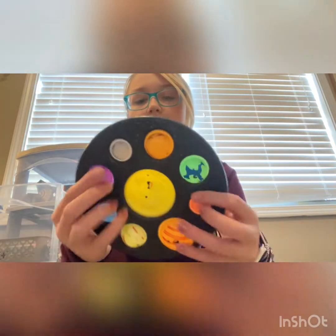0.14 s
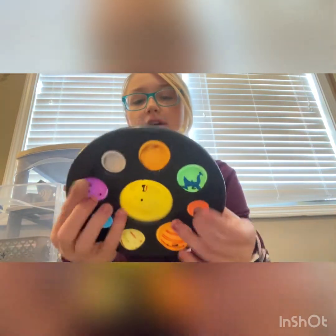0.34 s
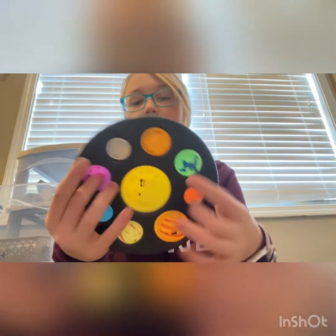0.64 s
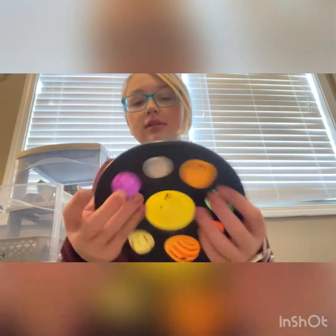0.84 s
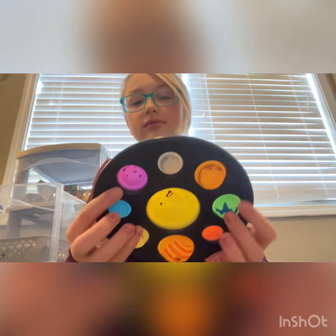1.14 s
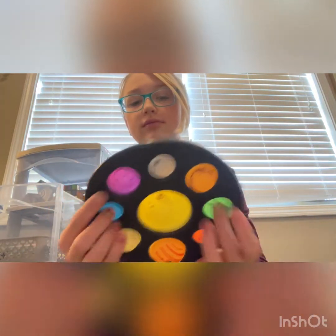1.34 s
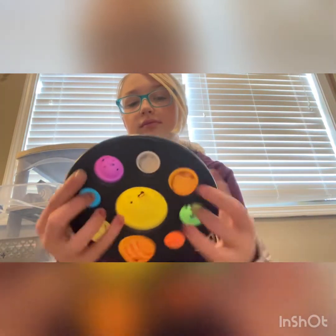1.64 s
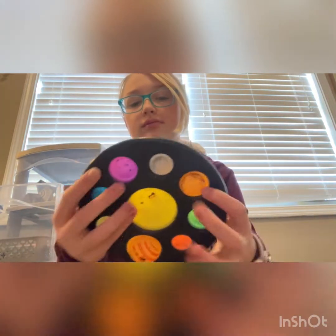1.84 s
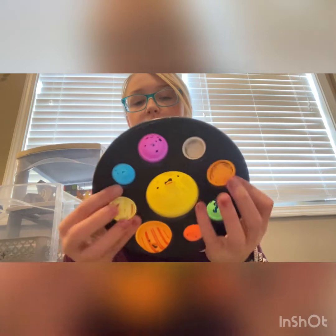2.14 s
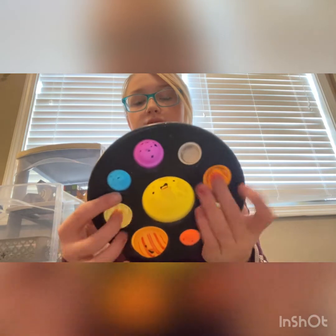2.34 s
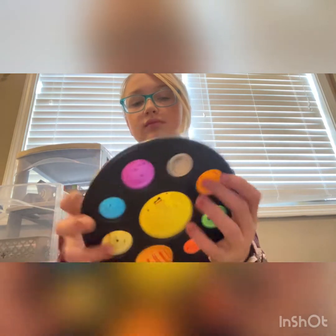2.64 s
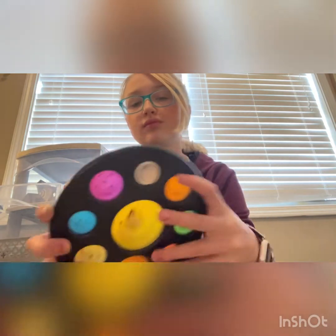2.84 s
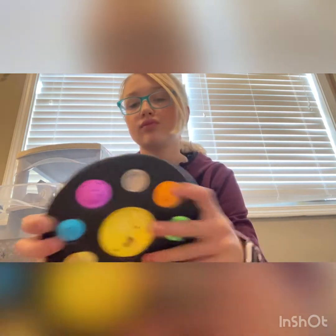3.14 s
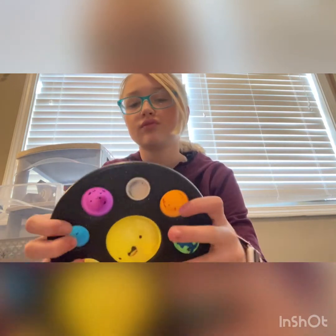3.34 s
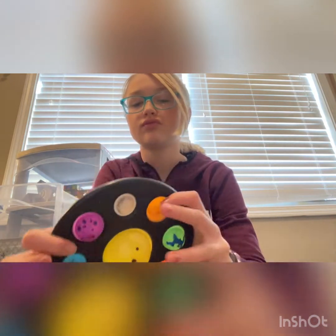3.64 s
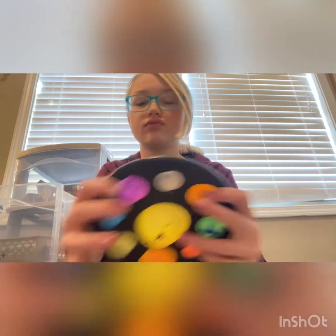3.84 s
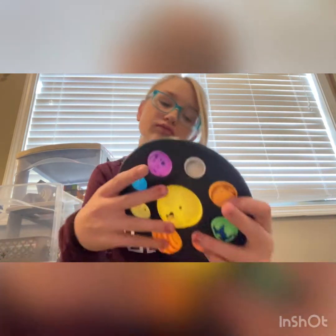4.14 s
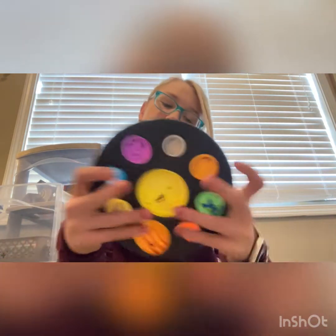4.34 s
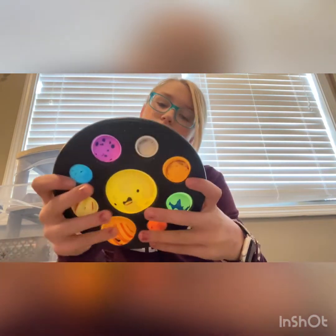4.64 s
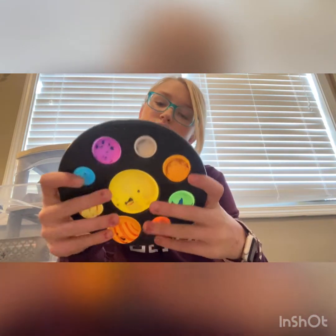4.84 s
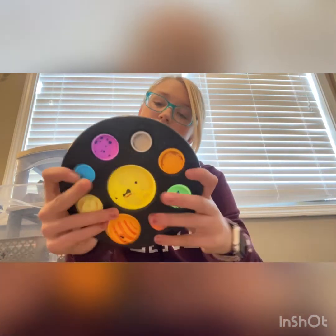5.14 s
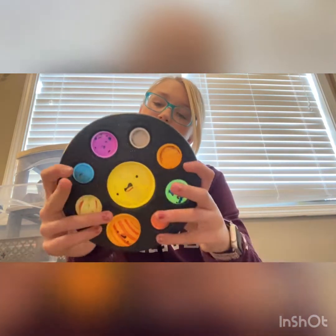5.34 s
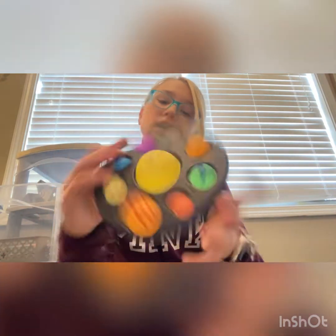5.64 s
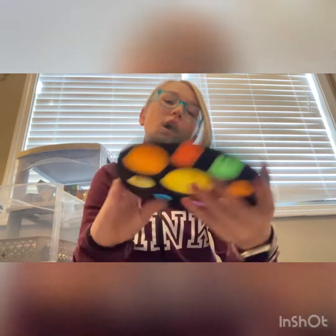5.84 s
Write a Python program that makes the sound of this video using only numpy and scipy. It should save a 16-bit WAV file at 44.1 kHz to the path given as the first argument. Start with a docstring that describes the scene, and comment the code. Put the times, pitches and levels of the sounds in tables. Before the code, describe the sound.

Sharp, hollow pops come unevenly from a hand-held silicone fidget disc, with soft finger taps, scuffs and low thuds between them.

```python
"""Small quiet room: fingers pop the silicone dimples of a hand-held fidget disc. Each dimple buckles in a short
flurry of snaps that rings its air cup and thumps the disc. Fingers rub and tap between pops; the disc recoils
with a low thud after most pops, and a few thuds fall between them, over faint air noise and mains hum. Two
microphone ports a few centimetres apart pick up the disc and its reverberation."""
import sys
import numpy as np
from scipy import signal
from scipy.fft import rfft, irfft
from scipy.io import wavfile

SR = 44100
rng = np.random.default_rng(int(sys.argv[2]) if len(sys.argv) > 2 else 0)


def pcm_store(signal):
    """Save signal as 16-bit PCM."""
    levels = np.round(np.clip(np.atleast_2d(signal), -1, 1) * 32767)
    wavfile.write(sys.argv[1], SR, levels.astype(np.int16).T)


N = 263318
T = np.arange(4096) / SR  # time axis of one event, s
CREAK_SAMPLES = 1024  # lead-in to a snap
SNAP_LEAD_S = CREAK_SAMPLES / SR + .0006
# diffuse field: f/Hz, left-right coherence
COHERENCE = [(60, 0.91), (290, 0.85), (640, 0.14), (1400, 0.4), (3100, 0.44)]


def amp(db):
    """dB to gain."""
    return 10 ** (np.asarray(db) / 20)


def unit_rms(x):
    """Scale to rms 1."""
    return x / np.sqrt(np.mean(x ** 2) + 1e-20)


def burst(x, ms):
    """Scale to the energy of a unit sine lasting ms."""
    return x / np.sqrt(np.sum(x ** 2) * 2000 / (ms * SR))


def log_interp(points, hz):
    """Interpolate (f/Hz, value) points over log frequency."""
    f, value = np.transpose(points)
    return np.interp(np.log(hz + 1), np.log(f + 1), value)


def colour(x, points):
    """Zero-phase filter from (f/Hz, gain/dB) points."""
    hz = np.fft.rfftfreq(x.shape[-1], 1 / SR)
    return irfft(rfft(x) * amp(log_interp(points, hz)), x.shape[-1])


def ring(x, hz, width_hz):
    """One damped mode."""
    r = np.exp(-np.pi * width_hz / SR)
    return signal.lfilter([1, 0, -r], [1, -2 * r * np.cos(2 * np.pi * hz / SR), r * r], x)


def add(mix, start_s, sound):
    """Mix in at start_s."""
    part = mix[..., round(start_s * SR):][..., :sound.shape[-1]]
    part += sound[..., :part.shape[-1]]


def diffuse_noise(samples):
    """Stereo noise, alike in the bass."""
    left, other = rfft(rng.standard_normal((2, samples)))
    coherence = log_interp(COHERENCE, np.fft.rfftfreq(samples, 1 / SR))
    right = coherence * left + np.sqrt(1 - coherence ** 2) * other
    return irfft(np.array([left, right]), samples)


def room_tone(air_db=-66, hum_hz=120, width_hz=110):
    """Faint air noise and mains hum; a narrow noise band makes the hum waver."""
    # air spectrum: f/Hz, relative level/dB
    air_spectrum = [(20, -27.5), (45, -12), (100, -6.5), (460, -27.5), (1400, -46.5), (2400, -46.5),
                    (16000, -49.5)]
    band = unit_rms(ring(ring(rng.standard_normal(N), hum_hz, width_hz), hum_hz, width_hz))
    hum = band + 4 * np.sin(2 * np.pi * hum_hz * np.arange(N) / SR)
    air = unit_rms(colour(diffuse_noise(N), air_spectrum))
    return amp(air_db) * air + amp(-77.5) * hum


def rub(slips_per_s=70, attack_s=.074, release_s=.026, grip_db=-84.5):
    """Skin sticks and slips on silicone: each slip scuffs and ticks in a cup. One swell per stroke."""
    # finger strokes: t/s, length/s, level/dB
    strokes = [(-0.02, 0.23, -67.5), (0.57, 0.41, -64), (1.24, 0.041, -52), (1.48, 0.12, -61.5),
               (1.613, 0.16, -58.5), (1.968, 0.22, -76), (2.421, 0.16, -61), (2.583, 0.33, -67.5),
               (2.925, 0.49, -62.5), (3.674, 0.12, -66), (3.793, 0.16, -54), (4.164, 0.274, -58),
               (5.456, 0.067, -56), (5.534, 0.25, -56), (5.719, 0.19, -58)]
    # friction hiss: f/Hz, relative level/dB
    hiss_spectrum = [(100, -10), (600, -9.5), (1350, -4.5), (2700, -11.5), (5000, -22), (15000, -26.5)]
    # nearest cup's modes: f/Hz, width/Hz, relative level/dB
    cup_modes = [(1310, 600, 6.5), (2500, 100, -1.5)]
    slips = (rng.random(N) < slips_per_s / SR) * amp(2.5 * np.minimum(rng.exponential(1, N), 3))
    scuff_shape = np.exp(-T / .006) * np.minimum(T / .001, 1)
    scuffs = 1.5 + signal.oaconvolve(slips, scuff_shape)[:N]
    jolts = signal.oaconvolve(slips, np.exp(-T / .0015))[:N] * rng.standard_normal(N)
    ticks = sum(amp(db) * unit_rms(ring(jolts, hz, width_hz)) for hz, width_hz, db in cup_modes)
    hiss = unit_rms(colour(scuffs * rng.standard_normal(N), hiss_spectrum))
    t = np.arange(N) / SR
    envelope = amp(grip_db)
    for start_s, length_s, db in strokes:
        swell = np.clip((t - start_s) / attack_s, 0, 1) ** 2
        fade = np.exp(-np.maximum(t - start_s - length_s, 0) / release_s)
        envelope = envelope + amp(db) * swell * fade
    return envelope * (hiss + amp(-7) * ticks)


def snap(cup_hz, crack_db, ms, second_hz, width_hz, creak_db, second_width_hz=290):
    """A creak grows into uneven snaps that ring two air-cup modes and give a broad crack.
    Row 0 faces the microphone; row 1 leaves sideways as one less tuned knock."""
    # crack spectrum: f/Hz, gain/dB
    crack_spectrum = [(500, 7), (1500, 6), (2800, 11.5), (4200, 7.5), (6000, 0), (14000, -6)]
    noise, unevenness = rng.standard_normal((2, len(T)))
    t = T - CREAK_SAMPLES / SR
    progress = np.maximum(t, 0) / (ms / 1000)
    creak = amp(creak_db) * np.exp(-abs(t) / .0061) * np.minimum(T * 200, 1)
    buckling = np.minimum(progress * 10, 1) * np.exp(-progress ** 2)
    flurry = noise * amp(2 * unevenness) * (buckling + creak)
    knock = signal.unit_impulse(len(T), CREAK_SAMPLES + round(ms * SR / 2000))
    cup = np.array([burst(ring(ring(drive, cup_hz, band_hz), cup_hz, 4.5 * band_hz), ms)
                    for drive, band_hz in ((flurry, width_hz), (knock, 1.85 * width_hz))])
    second = np.array([burst(ring(drive, second_hz, band_hz), ms)
                       for drive, band_hz in ((flurry, second_width_hz), (knock, 4 * second_width_hz))])
    first_snaps = flurry * np.exp(-1.5 * progress)
    crack = colour(np.array([burst(first_snaps, ms), burst(knock, ms)]), crack_spectrum)
    return cup + amp(.4 * crack_db - 10) * second + amp(crack_db) * crack


def taps(second_ratio=2.1):
    """Fingertips tap the silicone and ring a cup; length and second mode vary per tap."""
    # taps: t/s, cup level/dB, cup f/Hz, crack drive/dB re cup
    hits = [(0.057, -44, 1330, -25), (0.087, -35, 995, -24), (0.238, -41.5, 1460, -0.5),
            (0.305, -38.5, 1430, -13), (0.591, -33.5, 1240, -7.5), (0.702, -29.5, 1120, -5.5),
            (0.721, -32, 1300, -7.5), (0.77, -36.5, 1210, -13), (0.787, -38.5, 1250, -7.5),
            (0.898, -44.5, 1540, 1), (0.908, -49, 1500, 5), (0.94, -41.5, 1350, -4.5),
            (0.984, -33, 1210, -14.5), (1.056, -41, 1400, -43), (1.506, -42, 1820, -9.5),
            (1.649, -36.5, 1460, -6), (1.71, -34, 1390, -5), (1.777, -38.5, 1340, 2),
            (1.853, -33, 1250, -52), (1.86, -34.5, 1180, -22), (1.888, -29.5, 1240, -16),
            (2.272, -43, 1050, 4.5), (2.51, -37, 910, -21.5), (2.526, -36, 1630, -1),
            (2.642, -38, 1520, -8.5), (2.81, -47.5, 1890, -18), (2.998, -36, 1050, -44.5),
            (3.29, -42.5, 1230, -2), (3.319, -34, 1203, -4.5), (3.849, -35.5, 1480, -6),
            (4.157, -51, 1436, -10), (4.228, -37.5, 1320, -17.5), (4.285, -39, 1010, -26),
            (4.432, -29.5, 950, -17.5), (4.6, -50.5, 1467, -2.5), (4.708, -48.5, 1434, -8.5),
            (5.06, -44, 1530, -19.5), (5.463, -45, 1290, -8), (5.572, -36.5, 1530, -12),
            (5.613, -41.5, 1180, -11), (5.657, -29.5, 1210, -34), (5.674, -34, 1330, -6)]
    out = np.zeros((2, N))
    for at_s, db, cup_hz, crack_db in hits:
        stretch, detune = rng.uniform(.78, 1.4, 2)
        second_hz = second_ratio * cup_hz * detune
        tap = snap(cup_hz, crack_db, 2.4 * stretch, second_hz, width_hz=330, creak_db=-13.5)
        add(out, at_s - SNAP_LEAD_S, amp(db) * tap)
    return out


def thump(hz, glide, decay_cycles, rise_cycles):
    """The disc flexes; pitch sags to hz as the membrane relaxes. Peak 1."""
    cycles = T * hz
    phase = 2 * np.pi * np.cumsum(hz * (1 + glide * np.exp(-cycles / .26))) / SR
    flex = np.sin(phase) * (1 - np.exp(-cycles / rise_cycles)) * np.exp(-cycles / decay_cycles)
    return flex / np.max(abs(flex))


def pops(disc_hz=154):
    """Dimples flip with a snap and a thump; thumps near the disc's flexing mode ring on."""
    # flips: t/s, cup level/dB, cup f/Hz, thump level/dB re cup, thump f/Hz,
    # crack drive/dB re cup, buckling time/ms, second mode f/Hz
    flips = [(0.128, -36, 1300, -1.5, 420, -6, 9, 3400), (0.355, -26, 1340, -2, 159.9, -12.5, 12, 2320),
             (0.414, -22.5, 870, 0.5, 353, -18, 2.2, 2380), (0.434, -16, 826, -1, 423, -6.5, 5.7, 2730),
             (1.194, -34.5, 1030, -12, 400, -7, 4.85, 2260),
             (1.3206, -13.5, 1305, -15, 336, -28, 1.57, 2470), (1.329, -16, 2910, -9, 200, -7, 2.3, 1370),
             (1.352, -28, 1300, 2.5, 324, -12, 10.7, 2490), (1.74, -28, 1410, -15.5, 224, -12, 5.5, 2420),
             (2.332, -22, 1040, -0.5, 353, -42.5, 4.7, 2580),
             (2.346, -14, 860, -2.5, 373, -4.5, 8.65, 2450), (2.355, -13, 1050, -1, 344, -35, 2.87, 2260),
             (2.872, -12, 1200, -15.5, 155, -2.5, 3.6, 4200),
             (2.904, -9.5, 1190, -3.5, 208, -6, 5.57, 2640), (3.101, -27.5, 1650, 5.5, 384, -3.5, 4, 2780),
             (3.1276, -12, 1284, -0.5, 318, -5.5, 5.3, 2450), (3.5, -32, 1086, 5, 350, -10, 3.9, 4080),
             (3.5569, -13, 1278, 2, 350, -3, 6.2, 4050), (3.874, -26.5, 1440, -5, 274, -1, 6.1, 2440),
             (3.961, -18.5, 1183, 2.5, 294, -3, 5.93, 2370), (4.334, -28, 740, 7, 308, -9, 10.4, 3150),
             (4.3442, -15, 1326, -1, 440, -8, 7.45, 2750), (5.121, -10, 1548, -5.5, 383, -7.5, 9.3, 3925),
             (5.743, -26.5, 1440, -9.5, 254, 0, 12, 2636)]
    out = np.zeros((2, N))
    for at_s, db, cup_hz, thump_db, thump_hz, crack_db, ms, second_hz in flips:
        pop = snap(cup_hz, crack_db, ms, second_hz, width_hz=391, creak_db=-29.5)
        add(out, at_s - SNAP_LEAD_S, amp(db) * pop)
        resonance = np.exp(-((thump_hz - disc_hz) / 15) ** 2)
        flex = thump(thump_hz, glide=.035, decay_cycles=.65 + 3.5 * resonance, rise_cycles=.43)
        add(out, at_s + .0018, amp(db + thump_db) * flex)
    return out


def thuds():
    """Low, rubbery thuds of the disc: most come just after a pop as the disc recoils, a few fall between pops."""
    # thuds: t/s, level/dB
    low_thuds = [(0.375, -35), (0.431, -32.5), (0.604, -44), (0.754, -42.5), (0.917, -45), (0.955, -38),
                 (1.35, -30), (1.729, -37.5), (2.012, -43.5), (2.055, -50.5), (2.364, -33.5), (2.6, -36),
                 (2.924, -31), (3.576, -28.5), (3.893, -36), (4.369, -25.5), (5.139, -26.5), (5.764, -31)]
    fade = np.hanning(2 * len(T))[len(T):]
    thud = thump(hz=75.4, glide=.99, decay_cycles=.43, rise_cycles=1.2) * fade
    out = np.zeros(N)
    for at_s, db in low_thuds:
        add(out, at_s - .013, amp(db) * thud)
    return out


def ports(x):
    """Direct sound reaches the two ports with a phase and level offset."""
    # phase offset: f/Hz, left lead/rad
    phase_lead = [(0, 0), (1700, -.1), (2400, -1.7), (3450, -1.5), (4100, -.6), (5200, -3.1), (6200, -2.8),
                  (16100, 9.4)]
    # balance: f/Hz, left minus right/dB
    balance = [(100, -.5), (1500, -2), (5500, -2.5), (8000, 0)]
    hz = np.fft.rfftfreq(N, 1 / SR)
    lead_rad = np.interp(hz, *np.transpose(phase_lead))
    half_offset = amp(log_interp(balance, hz) / 2) * np.exp(.5j * lead_rad)
    return irfft(rfft(x) * np.array([half_offset, 1 / half_offset]), N)


def reverb(x, build_s=.006, echoes_s=.016):
    """A diffuse tail builds to a cluster of wall echoes; each band decays at its own rate."""
    # room decay: f/Hz, T60/s
    t60 = [(100, 0.28), (260, 0.21), (700, 0.29), (1500, 0.28), (4850, 0.26), (12800, 0.12)]
    # reverberation send: f/Hz, gain/dB
    send = [(60, -10), (300, -13.5), (1400, -14), (4000, -14.5), (12000, -11)]
    hz, frame_s, bands = signal.stft(diffuse_noise(SR // 2), SR, nperseg=256)
    decay = amp(-60 * frame_s / log_interp(t60, hz)[:, None])
    tail = signal.istft(bands * decay, SR, nperseg=256)[1]
    t = np.arange(tail.shape[1]) / SR
    tail *= np.minimum(t / build_s, 1) + np.exp(-((t - echoes_s) / .004) ** 2)
    tail /= np.linalg.norm(tail[0])
    return signal.fftconvolve(colour(x, send)[None], tail, axes=1)[:, :N]


def scene(crossfade_hz=1.3):
    """Direct sound plus room; two diffuse tails crossfade, so each pop rings a little differently."""
    facing, sideways = pops() + taps() + thuds() + rub()
    crossfade_rad = 2 * np.pi * crossfade_hz * np.arange(N) / SR
    reflected = reverb(sideways * np.cos(crossfade_rad)) + reverb(sideways * np.sin(crossfade_rad))
    return ports(facing) + reflected + room_tone()


def record(dry, low_hz=42, ceiling=.95, high_hz=16300):
    """Microphone: bass cut, soft peak saturation, band limit."""
    thin = signal.sosfilt(signal.butter(3, low_hz, "high", fs=SR, output="sos"), dry)
    saturated = thin / (1 + (thin / ceiling) ** 4) ** .25
    lowpass = signal.firwin(255, high_hz, window=("kaiser", 9), fs=SR)
    return signal.oaconvolve(saturated, lowpass[None], "same")


dry = scene()
out = record(dry)
pcm_store(out)
```